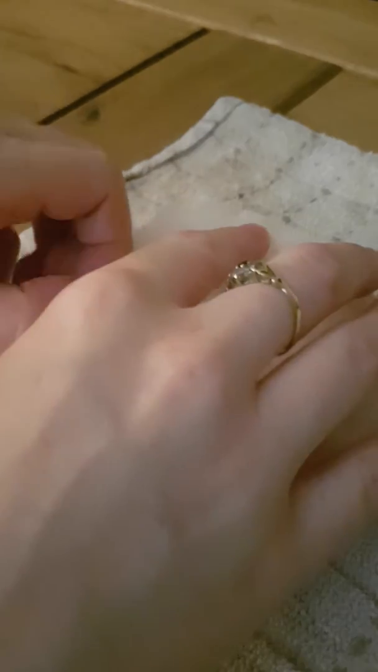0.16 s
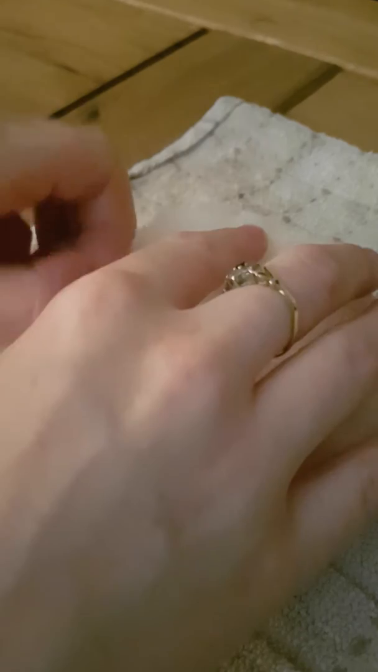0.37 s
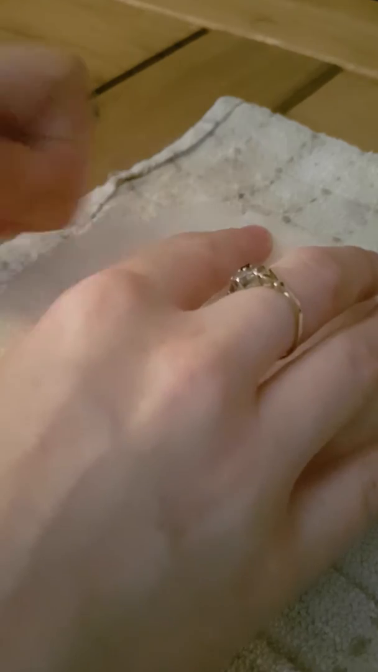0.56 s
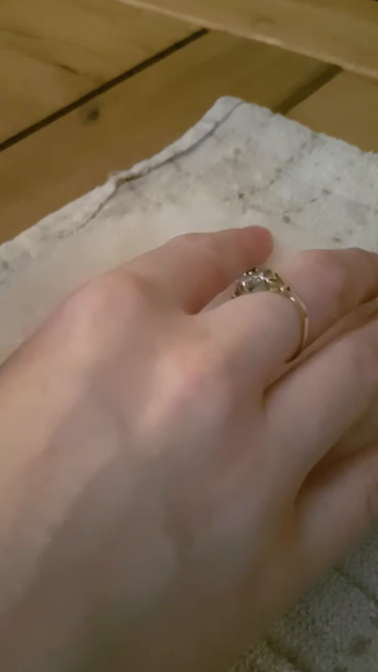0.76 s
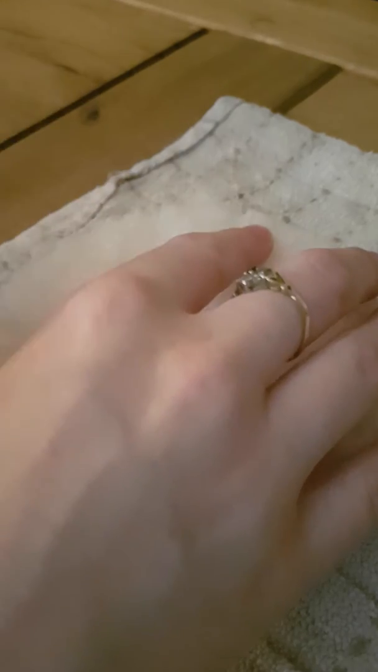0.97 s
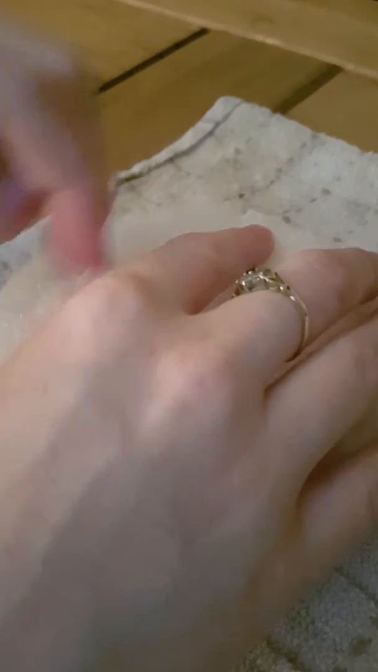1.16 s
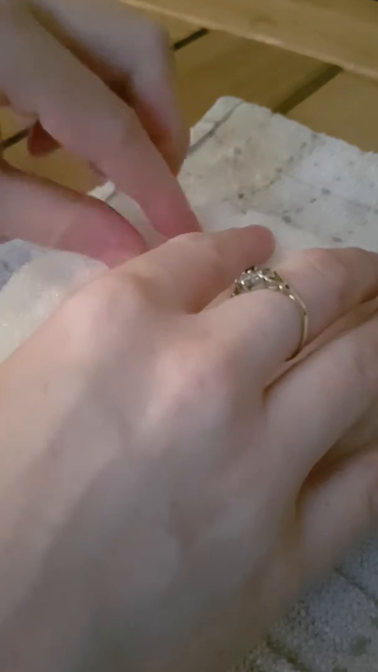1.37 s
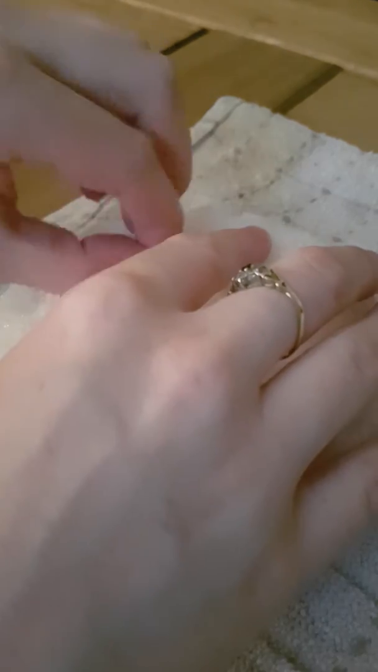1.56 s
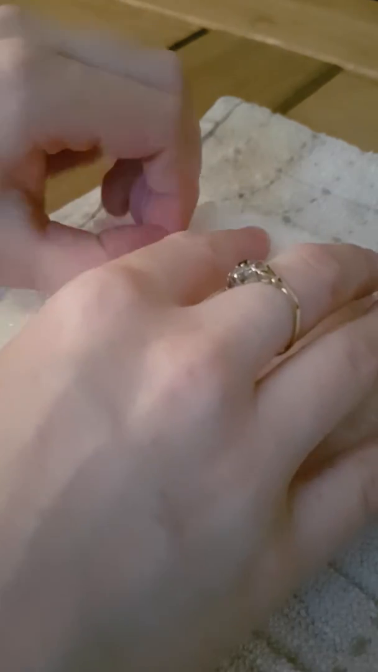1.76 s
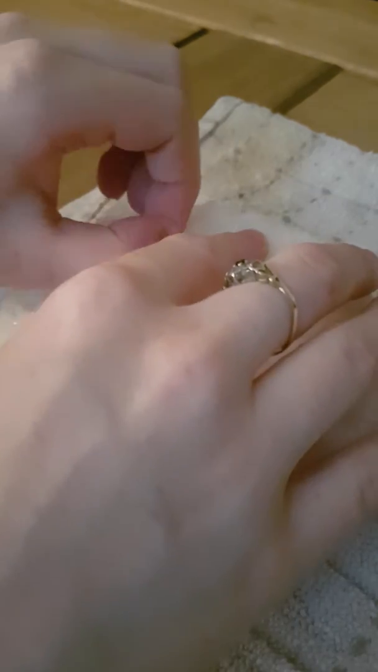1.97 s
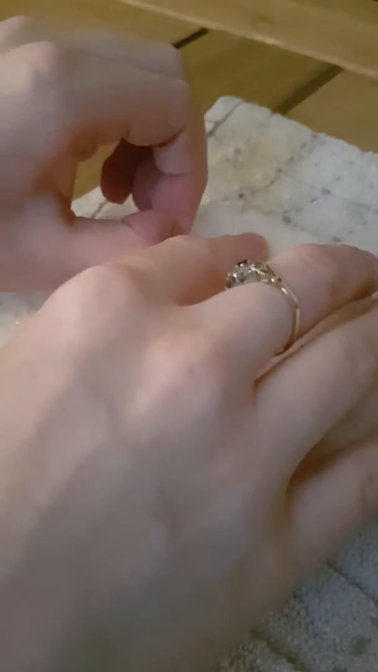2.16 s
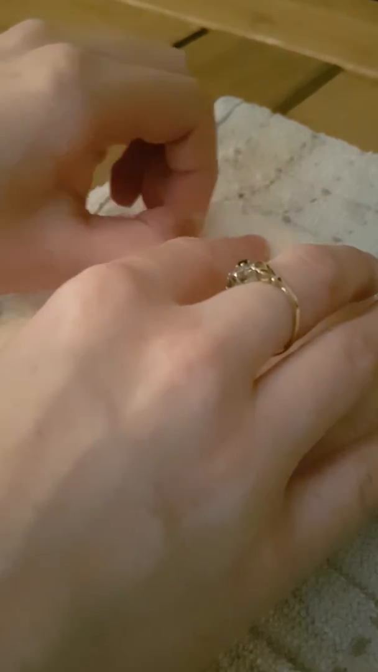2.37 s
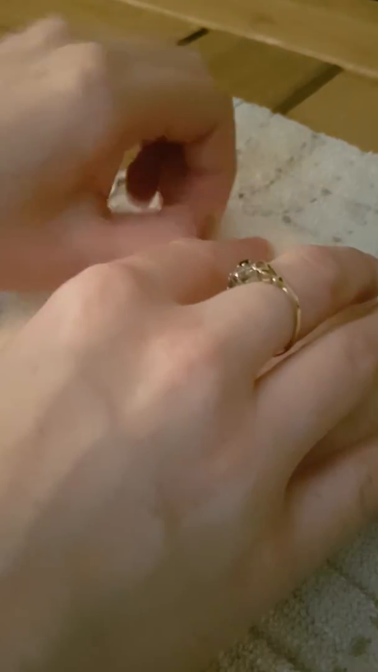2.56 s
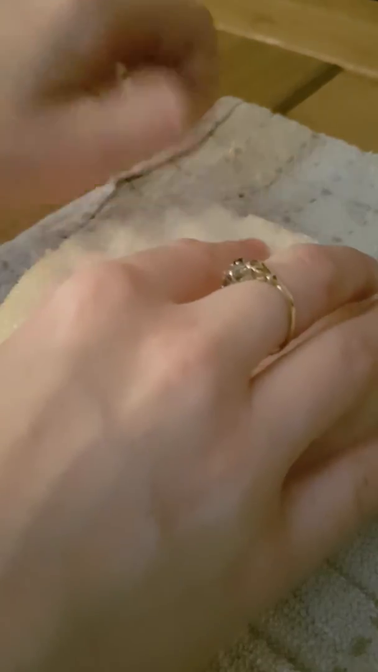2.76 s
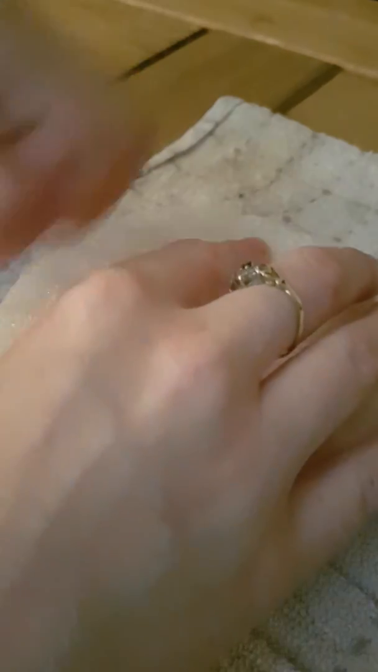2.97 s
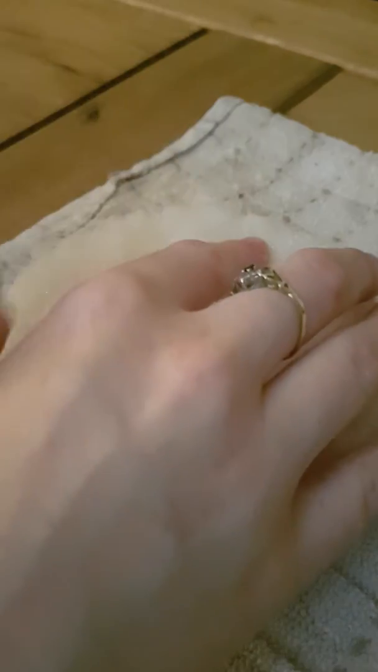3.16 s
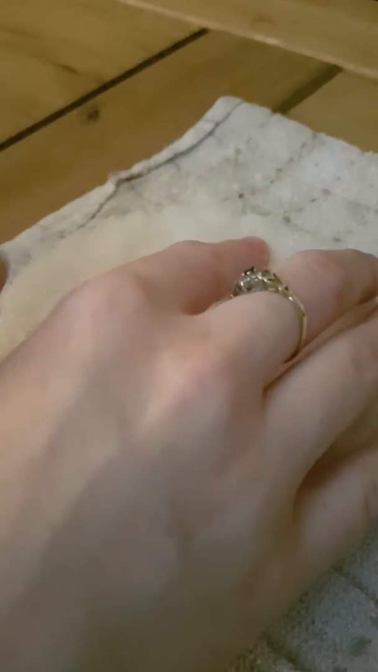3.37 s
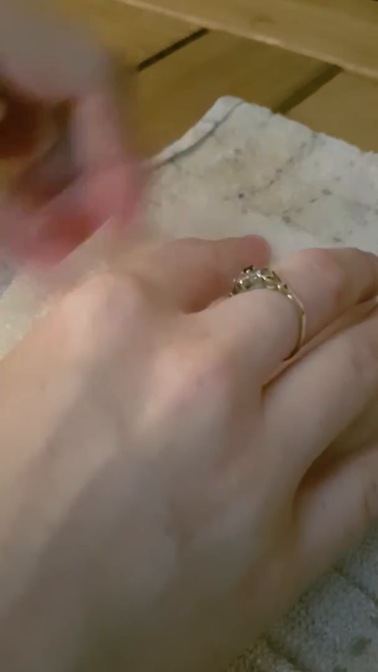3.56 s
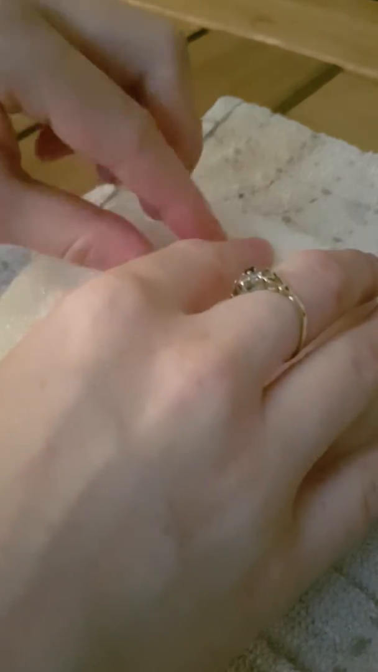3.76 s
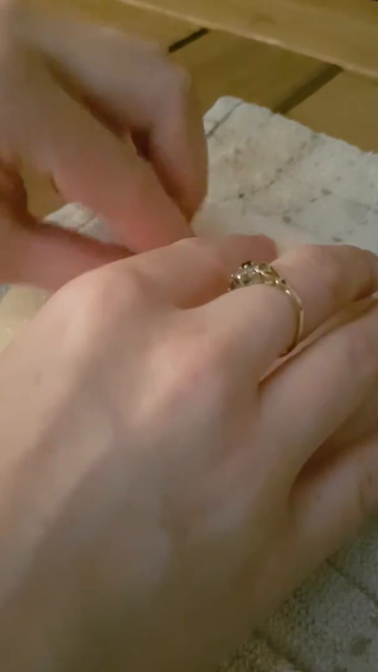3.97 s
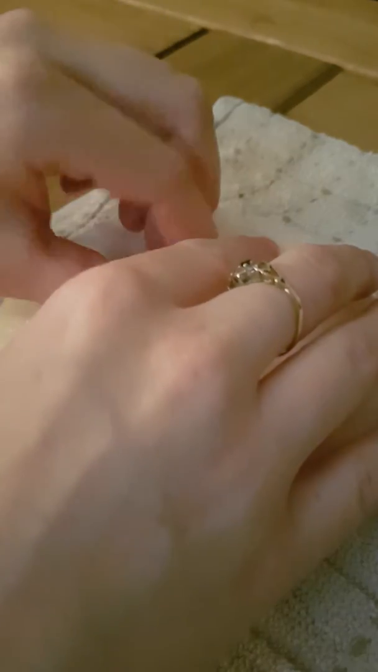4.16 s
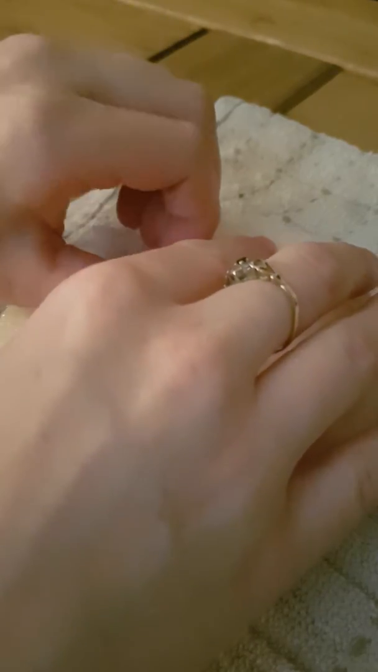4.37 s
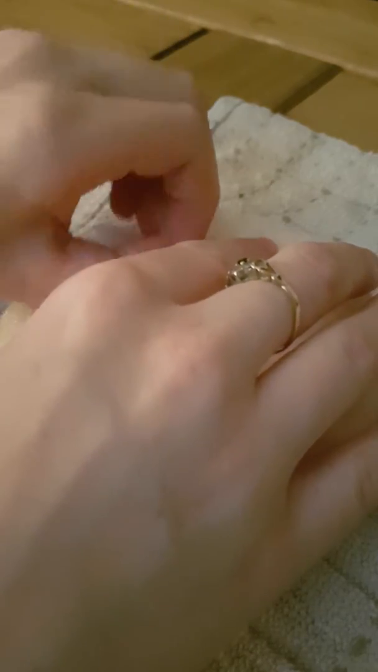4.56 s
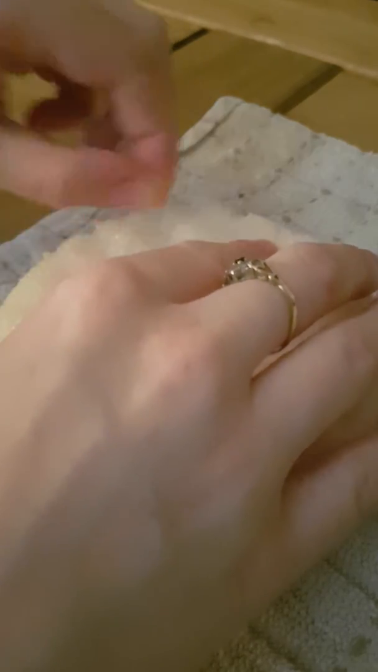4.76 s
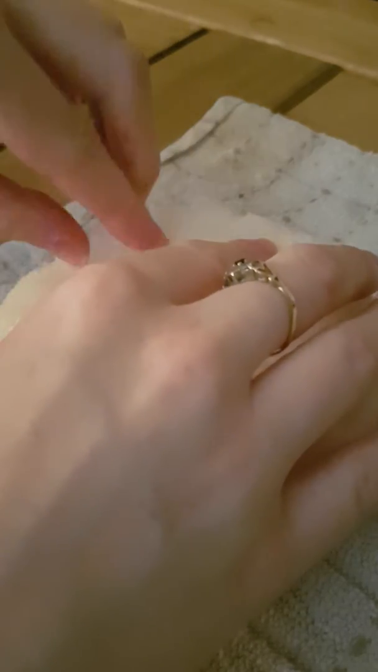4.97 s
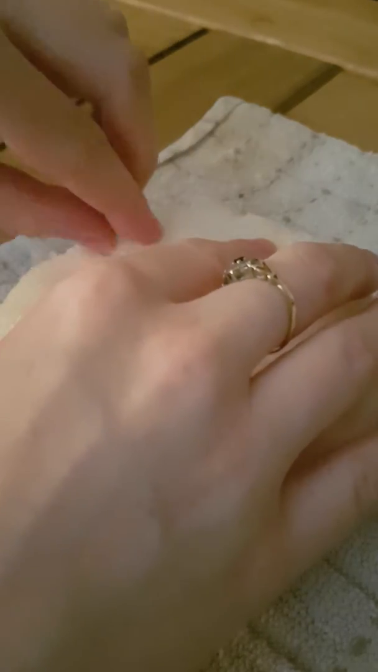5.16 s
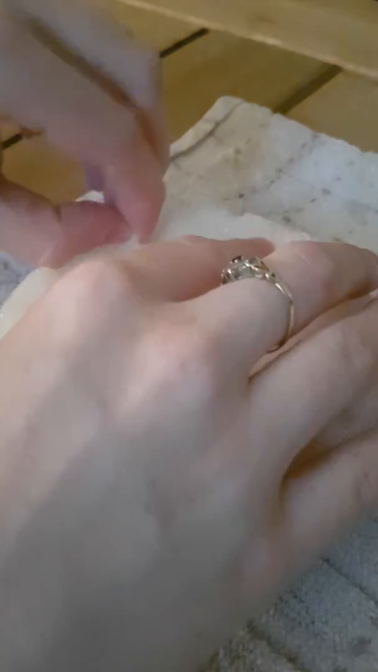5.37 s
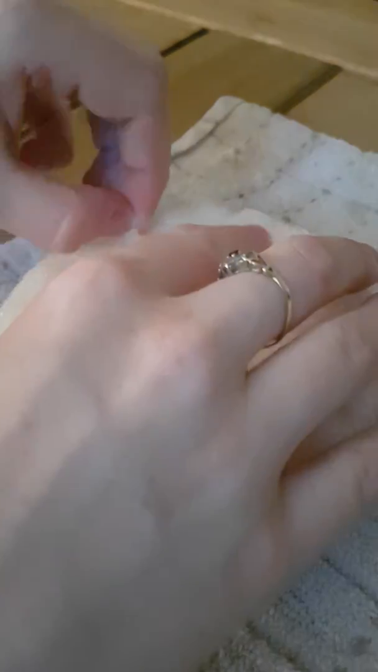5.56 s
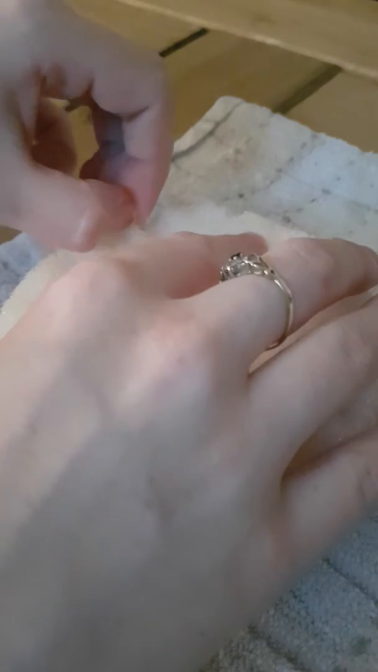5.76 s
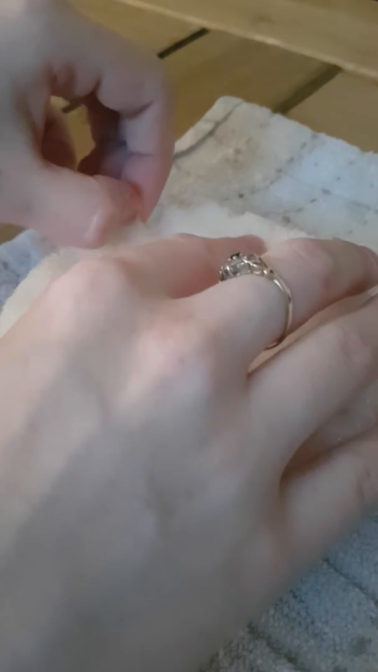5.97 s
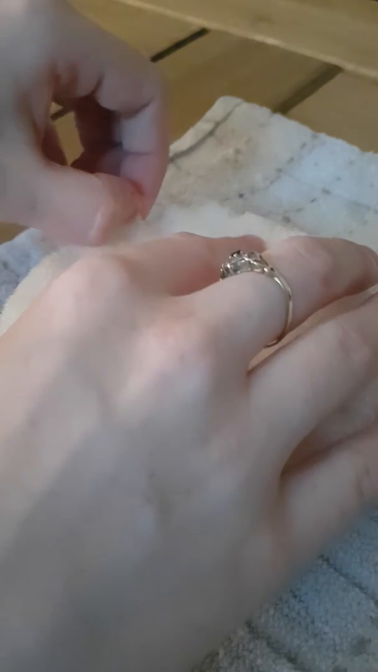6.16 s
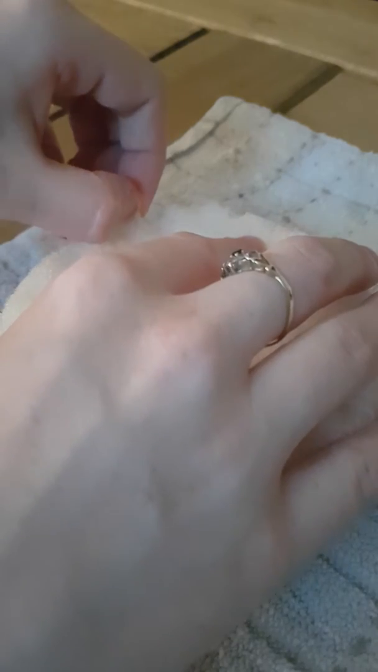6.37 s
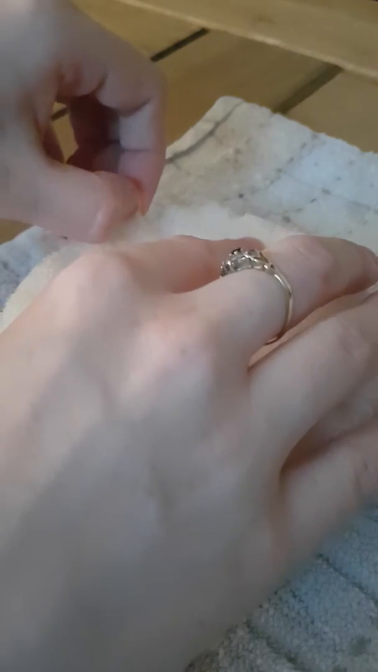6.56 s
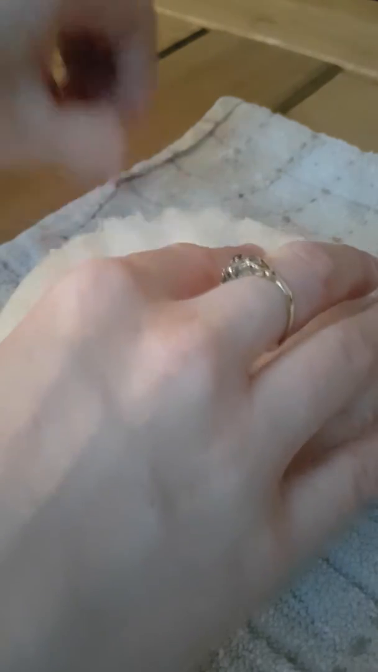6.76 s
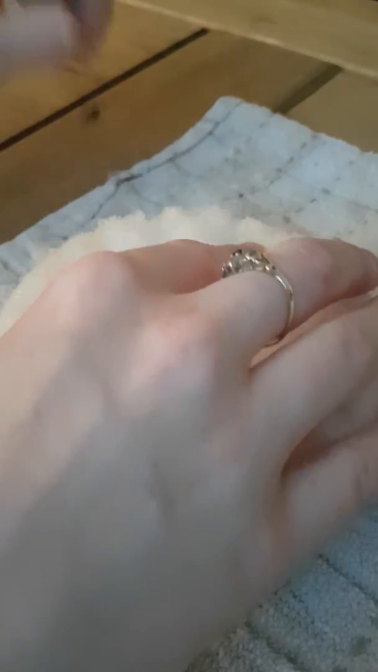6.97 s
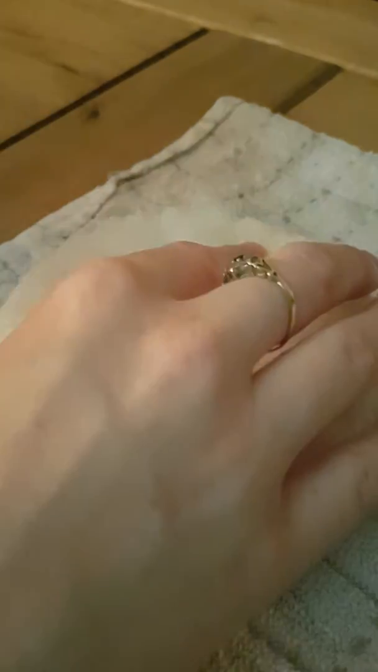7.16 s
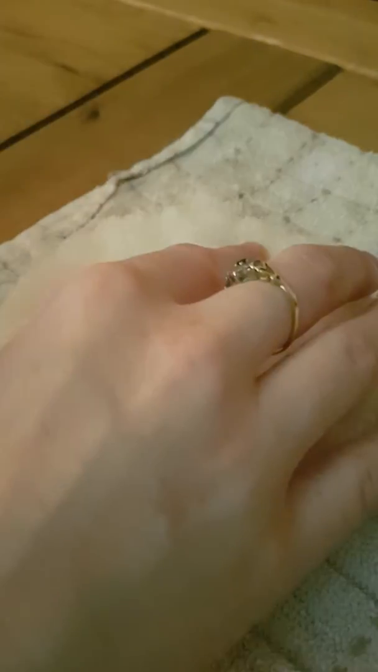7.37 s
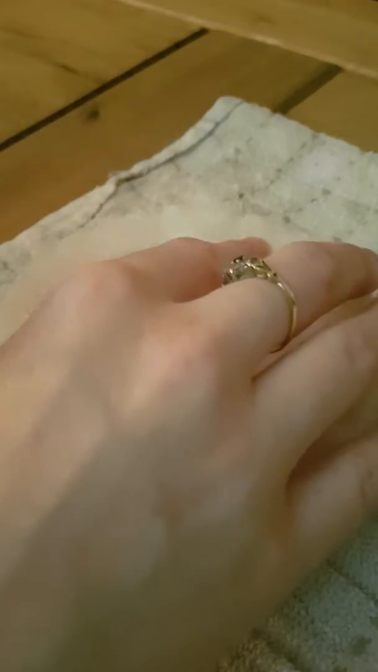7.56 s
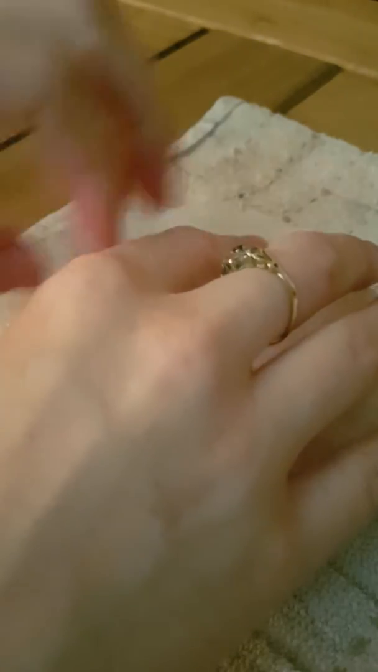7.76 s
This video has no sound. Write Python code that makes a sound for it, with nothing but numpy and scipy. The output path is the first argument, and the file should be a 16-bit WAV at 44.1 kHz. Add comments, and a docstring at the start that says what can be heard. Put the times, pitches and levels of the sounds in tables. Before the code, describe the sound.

Close, dry foam picking: soft rumbling touches and skin scrapes, sharp little clicks gathering into rushes, each tuft springing free with a low pop.

```python
"""Tufts pulled from a foam sponge

A quiet room with a faint hum; fingers pinch a foam sponge right by the microphone and pull out four tufts.
Skin and nails rub over the open cells: random catches and shoves, coloured and swelling with the touch.
Stretched strands snap one by one, then in a rush, as filtered clicks that jolt the block into ringing.
When a tuft comes free the foam springs back with a dull pop: a short swing of sinking pitch."""
import sys
import numpy as np
from scipy import signal
from scipy.fft import rfft, irfft, next_fast_len
from scipy.io import wavfile

SR = 44100
rng = np.random.default_rng(int(sys.argv[2]) if len(sys.argv) > 2 else 0)


def to_wav(s):
    """Save 16-bit WAV."""
    ch = np.atleast_2d(s).T  # columns
    pcm = np.round(np.clip(ch, -1, 1) * 32767)  # PCM
    wavfile.write(sys.argv[1], SR, pcm.astype(np.int16))


N = 344421


def from_db(db):
    """Decibels to gain."""
    return 10 ** (np.asarray(db) / 20)


def rms_one(x):
    """Scale to an rms of one."""
    return x / np.sqrt(np.mean(x ** 2) + 1e-20)


def in_time(rows):
    """Each column of a curve table, sample by sample."""
    s, *columns = np.transpose(rows)
    return [np.interp(np.arange(N) / SR, s, column) for column in columns]


def coloured(x, spectrum):
    """Give a flat source a spectrum, falling away below its first point; rms 1."""
    hz, db = np.transpose(spectrum)
    size = next_fast_len(N)
    bins = np.maximum(np.fft.rfftfreq(size, 1 / SR), 1)
    slope_db = np.interp(np.log(bins), np.log(hz), db)
    gain = from_db(slope_db) * np.minimum(bins / hz[0], 1)
    return rms_one(irfft(rfft(x, size) * gain, size)[:N])


def drift(rate):
    """Slow chance with an rms of one, heading for a new value so many times a second."""
    steps = np.arange(N) / SR * rate
    return rms_one(np.interp(steps, np.arange(N // 10), rng.standard_normal(N // 10)))


def cut(x, hz, kind, order=2):
    """Butterworth low- or high-pass."""
    edge_hz = np.clip(hz, 10, SR / 2 - 2000)
    return signal.sosfilt(signal.butter(order, edge_hz, kind, fs=SR, output="sos"), x)


def bell(x, hz, width_hz, db):
    """Raise or lower one band."""
    b, a = signal.iirpeak(hz, hz / width_hz, fs=SR)
    return x + (from_db(db) - 1) * signal.lfilter(b, a, x)


def add(track, s, sound):
    """Mix a sound into a track at a time."""
    at = round(s * SR)
    track[at:at + len(sound)] += sound[:N - at]


def grains(per_s, spread_db, size):
    """Random clicks of uneven strength and either sign."""
    strength = from_db(spread_db * np.minimum(rng.exponential(1, size), 4))
    return (rng.random(size) < per_s / SR) * strength * rng.choice([-1, 1], size)


# colour of the background hiss: pitch_hz, relative_level_db
HISS_COLOUR = [(25, -8), (55, -4.5), (100, -1.5), (160, -6), (280, -7), (500, -8), (1000, -14), (2300, -19),
               (6000, -24), (16000, -28.5)]
# mains hum: pitch_hz, mean_level_db
HUM = [(99, -71), (198, -80), (297, -82.5)]
HISS_DB = -67


def room():
    """Even background hiss with a faint hum that wavers in pitch and level."""
    t = np.arange(N) / SR + .0003 * drift(2.6)
    hum = sum(from_db(db) * np.sqrt(2) * np.cos(2 * np.pi * hz * t) for hz, db in HUM)
    hiss = from_db(HISS_DB) * coloured(rng.standard_normal(N), HISS_COLOUR)
    return hiss + from_db(1.3 * drift(1.1)) * hum


STROKE_ATTACK_S, STROKE_SAG_DB_PER_S, STROKE_RELEASE_S = 0.0053, 15, .009


def contact(t, start_s, length_s):
    """Gain of one touch: a quick attack, a hold, a release."""
    before = (start_s - t) / STROKE_ATTACK_S
    after = (t - start_s - length_s) / STROKE_RELEASE_S
    return np.exp(-np.clip(np.maximum(before, after), 0, 20))


# finger and thumb close on the foam and hold it: start_s, end_s, relative_rumble_db, relative_scratch_db
PINCHES = [(-.2, .43, -50, -64), (1.335, 2.27, -48, -59), (3.854, 4.64, -46, -61.5), (4.938, 5.8, -49, -62)]
# fingers shift on the foam: start_s, length_s, relative_rumble_db, relative_scratch_db
STROKES = [(0.056, .07, -42, -55.5), (0.281, 0.041, -45, -56), (0.496, .035, -40, -62),
           (0.58, 0.024, -49, -58.5), (.63, 0.34, -70, -82), (1.346, 0.061, -38, -55.5),
           (1.574, 0.042, -39.5, -61), (1.649, 0.02, -39, -77), (1.913, 0.017, -48, -58.5),
           (2.134, 0.15, -50, -61), (2.325, 0.038, -49, -61), (2.426, 0.23, -49, -60.5),
           (2.708, 0.066, -43.5, -69), (2.926, 0.021, -47, -79), (3.204, 0.029, -53, -82),
           (3.753, 0.026, -56, -70.5), (3.859, 0.042, -41.5, -63.5), (4.002, 0.032, -36, -56),
           (4.111, 0.045, -40, -57), (4.226, 0.014, -47.5, -58.5), (4.591, 0.071, -36.5, -56),
           (4.785, .025, -52, -77), (4.96, 0.032, -36, -56), (5.099, 0.047, -40.5, -58),
           (5.311, 0.042, -47, -63), (5.912, 0.05, -52.5, -60), (6.685, 0.055, -43, -58),
           (6.903, .045, -52, -70), (7.55, .3, -64, -73.5)]
SQUEEZE_S, HOLD_DB = 0.24, -8.5   # the squeeze is hardest this long after landing, then eases to a hold
FIRM_SLIDE_DB = -39   # a slide this loud grips the foam fully
REST_RUMBLE_DB, REST_SCRATCH_DB = -69.5, -77.5   # the other hand lies on the sponge
# after a pop: delay, fade over the slide, rumble above scratch
SLIDE_LAG_S, SLIDE_FADE_DB, SLIDE_RUMBLE_DB = 0.013, 23.5, 12.5


def fingers():
    """Rumble dB, scratch dB and grip (0-1): touches add as power while fingers pinch, shift and slide off."""
    t = np.arange(0, N / SR, .001)
    touches, grip = [(np.ones(len(t)), REST_RUMBLE_DB, REST_SCRATCH_DB)], np.zeros(len(t))
    for start, end, rumble_db, scratch_db in PINCHES:
        age = np.maximum(t - start, 0) / SQUEEZE_S
        squeeze = (age * np.exp(1 - age)) ** 3.24
        pressure = from_db(HOLD_DB * (1 - squeeze))
        touches.append((contact(t, start, end - start) * pressure, rumble_db, scratch_db))
        grip += squeeze * (start > 0)   # a pinch already under way at the start adds no grip
    for start, length, rumble_db, scratch_db in STROKES:
        sag = from_db(-STROKE_SAG_DB_PER_S * np.maximum(t - start, 0))
        touches.append((contact(t, start, length) * sag, rumble_db, scratch_db))
    for free_s, *_, slide_db, length in TUFTS:
        start = free_s + SLIDE_LAG_S
        sliding = contact(t, start, length)
        fade = from_db(-SLIDE_FADE_DB * np.maximum(t - start, 0) / length)
        touches.append((sliding * fade, slide_db + SLIDE_RUMBLE_DB, slide_db))
        grip += sliding * from_db(slide_db - FIRM_SLIDE_DB)
    rumble = sum((gain * from_db(db)) ** 2 for gain, db, _ in touches)
    scratch = sum((gain * from_db(db)) ** 2 for gain, _, db in touches)
    return in_time(np.transpose([t, 10 * np.log10(rumble), 10 * np.log10(scratch), np.minimum(grip, 1)]))


LOOSE_HZ, TIGHT_HZ = 292, 544   # upper edge of the rumble: foam is stiffer the harder it is pinched


def gripped(x, grip):
    """A steep low-pass whose edge follows the grip, blended from a few fixed ones."""
    edges = np.geomspace(220, 660, 5)
    place = np.interp(LOOSE_HZ + (TIGHT_HZ - LOOSE_HZ) * grip, edges, np.arange(len(edges)))
    blended = np.zeros(N)
    for k, hz in enumerate(edges):
        share = np.maximum(1 - abs(place - k), 0)
        blended += share * rms_one(cut(x, hz, "low", order=6))
    return blended


# colour of the shoves, before the grip filters them: pitch_hz, relative_level_db
RUMBLE_COLOUR = [(30, -19.5), (55, -16.5), (85, 0.5), (125, 3.5), (190, -4), (290, -4.5), (450, -7),
                 (700, -15), (2000, -14)]
# colour of skin and nails on open cells, also of tearing fibres: pitch_hz, relative_level_db
SCRATCH_COLOUR = [(200, -7), (600, 4.5), (1300, -0.5), (2300, 1.5), (3300, -1), (4600, -0.5), (6000, -8),
                  (8000, -18), (11000, -20), (16000, -28.5)]
# colour of buckling cell walls: pitch_hz, relative_level_db
CRUNCH_COLOUR = [(200, -12), (400, 4.5), (600, -2), (950, -4), (1500, -11.5), (3000, -18), (8000, -46.5)]
SCRAPE_SHARE = .45   # share of the rumble's unevenness that the scratch follows


def rubbing(rumble_db, scratch_db, crunch_db, tick_db, tick_limit_db, slip_db, lumpy_db,
            catches_per_s, shoves_per_s, ticks_per_s):
    """Skin sticks and slips: cell walls flick past it, some buckle, and small shoves shake the block."""
    kneading, scratching, grip = fingers()
    # each small slip of the skin both shoves and scrapes
    lumps = lumpy_db * drift(38)
    kneading, scratching = kneading + lumps, scratching + SCRAPE_SHARE * lumps
    slip = from_db(slip_db * drift(110))

    # in a loud scrape the single catches merge into an even hiss
    sliding = np.clip((scratching + 58) / 6, 0, .6)
    single = rms_one(grains(catches_per_s, 5.3, N) * slip)
    merged = rng.standard_normal(N)
    catches = coloured(np.sqrt(1 - sliding) * single + np.sqrt(sliding) * merged, SCRATCH_COLOUR)
    scratch = from_db(scratching + scratch_db) * catches

    shoves = gripped(coloured(grains(shoves_per_s, 0.61, N), RUMBLE_COLOUR), grip)
    rumble = from_db(kneading + rumble_db) * shoves

    buckles = coloured(grains(170, 1.8, N) * slip, CRUNCH_COLOUR)
    crunch = from_db((kneading + scratching) / 2 + crunch_db) * buckles

    # a nail flicks single cell walls, which are too small to get loud
    flicks = coloured(grains(ticks_per_s, 1.5, N), SCRATCH_COLOUR)
    ticks = flicks * from_db(np.minimum(scratching, tick_limit_db) + tick_db)
    return scratch + ticks + crunch + rumble


# a fingertip bumps the block: start_s, height_db, taut_pitch_hz
KNOCKS = [(1.3525, -31.5, 105), (2.438, -35.5, 150), (3.856, -27.5, 116), (4.553, -36.5, 151.5),
          (5.2043, -29, 199), (5.241, -33.5, 200), (5.3102, -27, 177)]
# a tuft comes free: free_s, rush_lead_s, relative_snap_db, snap_brightness_hz, relative_crackle_db,
#   pop_height_db, taut_pop_hz, pop_swell_s, thud_height_db, taut_thud_hz, relative_slide_db, slide_length_s
TUFTS = [(0.4328, 0.0061, -13, 1850, -32.5, -16.5, 295, 0.0022, -42, 116, -49.5, 0.19),
         (2.6397, .025, -11.5, 2500, -20, -7.5, 210, .0023, -19.5, 105, -41.5, .11),
         (4.648, .008, -9.5, 2090, -27.5, -11, 314, 0.0026, -18.5, 116, -41.5, 0.093),
         (6.7768, .0125, -5.5, 2630, -20, -8, 148, .0068, -12.5, 93, -51, 0.097)]
THUD_SWELL_S, THUD_LAG_SWELLS = 0.0045, 3.2   # the whole block follows the pop


def recoils(relax_s, pop_slack, ring_slack, ring_db, ring_cycles, knock_cycles):
    """Released or bumped foam swings a few times and is soon still, its pitch sinking as the tension goes."""
    swings = [(s, db, hz, ring_slack, knock_cycles / hz) for s, db, hz in KNOCKS]
    for s, _, _, _, _, pop_db, pop_hz, swell_s, thud_db, thud_hz, *_ in TUFTS:
        swings.append((s, pop_db, pop_hz, pop_slack, swell_s))
        # the higher modes of the block join in, less so after a slow pop
        for hz, mode_db, _ in FOAM_MODES:
            if hz > 1.6 * pop_hz:
                slow_loss_db = 20 * np.log10(1 + (hz * swell_s / 2.5) ** 2)
                height_db = pop_db + ring_db + mode_db - slow_loss_db
                swings.append((s, height_db, hz, ring_slack, ring_cycles / hz))
        swings.append((s + THUD_LAG_SWELLS * swell_s, thud_db, thud_hz, ring_slack, THUD_SWELL_S))
    out, t = np.zeros(N), np.arange(SR // 16) / SR
    for s, db, taut_hz, slack, swell in swings:
        hz = taut_hz * (slack + (1 - slack) * np.exp(-t / relax_s))
        # rises to one at the swell time, then dies away
        envelope = np.sqrt(t / swell * np.exp((1 - (t / swell) ** 2) / 2))
        add(out, s, from_db(db) * envelope * np.sin(2 * np.pi * np.cumsum(hz) / SR))
    return out


def rips(fibres_per_s, rise_s, stop_s, top_hz):
    """Breaking fibres crackle ever louder until the tuft is free, at the height of the pop."""
    t, level = np.arange(N) / SR, np.zeros(N)
    for s, _, _, _, crackle_db, _, _, swell_s, *_ in TUFTS:
        since = t - s - swell_s
        decay = np.maximum(-since / rise_s, since / stop_s)
        level += from_db(crackle_db) * np.exp(-np.minimum(decay, 20))
    fibres = coloured(grains(fibres_per_s, 2.9, N), SCRATCH_COLOUR)
    return cut(level * fibres, top_hz, "low")


# ring of the block of foam under the hand: nominal_pitch_hz, relative_level_db, t60_s (for jolts by snaps)
FOAM_MODES = [(135, -55, 0.032), (218.7, -23.5, 0.027), (404, -23.5, 0.02), (609, -26, 0.0052),
              (900, -35.5, 0.0017)]


def foam_ring(breaks, level_db, uneven_db, detune, dull_boost, travel_s):
    """Every snap jolts the block; its pitch shifts with the grip, and thick strands jolt it hardest."""
    hz, mode_db, t60 = np.transpose(FOAM_MODES)[:, :, None]
    out, t = np.zeros(N), np.arange(SR // 14) / SR
    for s, db, bright_hz in breaks:
        # both vary by chance from snap to snap
        grip, strike = rng.standard_normal((2, len(FOAM_MODES), 1))
        sizes = from_db(db + level_db + mode_db + uneven_db * strike - 60 * t / t60)
        swings = sizes * np.sin(2 * np.pi * hz * np.exp(detune * grip) * t)
        # waves are slow in foam, so the knock trails the click
        add(out, s + travel_s, swings.sum(axis=0) * (3000 / bright_hz) ** dull_boost)
    return cut(out, 1200, "low")


# stretched strands that snap on their own: start_s, relative_strength_db, brightness_hz
LONE_SNAPS = [(0.0484, -33, 2800), (.0737, -29, 2700), (0.093, -30.5, 2500), (0.1095, -22.5, 2360),
              (0.2797, -23.5, 3320), (0.284, -14.5, 3130), (.297, -21.5, 3100), (.3054, -22.5, 2600),
              (.3722, -31.5, 2500), (0.3943, -25.5, 2420), (1.382, -37.5, 3500), (1.553, -27, 2020),
              (1.5822, -34, 2090), (1.6086, -39, 1900), (1.65, -37, 3700), (1.9201, -24, 4300),
              (1.9464, -27, 3360), (2.124, -26.5, 2930), (2.145, -16, 3100), (2.1526, -15, 2150),
              (2.1693, -19.5, 3100), (2.1798, -13.5, 2730), (2.1975, -17.5, 4870), (2.2022, -21, 3400),
              (2.2105, -13, 2840), (2.216, -16.5, 3450), (2.223, -22, 3700), (2.245, -23, 3600),
              (2.253, -13, 3350), (2.3239, -12.5, 4130), (2.332, -18, 3140), (2.3348, -17, 3200),
              (2.3753, -17.5, 3160), (2.3785, -17.5, 2980), (2.4379, -34, 2950), (2.4864, -23.5, 3250),
              (2.5282, -23.5, 2940), (2.5525, -17, 2480), (2.5916, -18, 2400), (4.0052, -35, 3100),
              (4.0119, -29.5, 2600), (4.0366, -23.5, 1880), (4.1544, -17, 1690), (4.438, -40.5, 4400),
              (4.5527, -30, 2630), (4.5982, -16, 1840), (4.609, -24.5, 3100), (4.9766, -28.5, 2800),
              (5.0142, -34.5, 2430), (5.203, -29, 2200), (5.3045, -34, 3050), (5.318, -30, 2740),
              (5.5861, -30, 4840), (5.5954, -28, 4750), (5.6552, -33, 3730), (5.6993, -26, 4600),
              (5.7131, -20.5, 4500), (5.7334, -20.5, 4580), (5.7523, -21.5, 4400), (5.78, -24.5, 4060),
              (5.9076, -17, 4050), (5.915, -13.5, 3600), (5.928, -20, 4240), (5.932, -20.5, 4600),
              (5.9374, -18.5, 4100), (5.9513, -22.5, 3500), (5.9544, -15, 3500), (6.027, -23, 3230),
              (6.1487, -26.5, 4300), (6.1583, -21.5, 3500), (6.169, -22.5, 3500), (6.29, -18.5, 3460),
              (6.292, -22.5, 3530), (6.3557, -19, 3560), (6.3845, -25.5, 3900), (6.4782, -21, 3600),
              (6.486, -25, 3700), (6.5297, -28, 4100), (6.6392, -21.5, 4130), (6.672, -27, 3100),
              (6.6831, -21.5, 4100), (6.6901, -13.5, 3300), (6.702, -14.5, 3220), (6.72, -20, 3500),
              (6.7338, -14, 4000), (6.7397, -17, 4200), (6.7584, -10.5, 3830)]
# a strand may take its neighbour with it: chance, mean delay, relative strength
NEIGHBOUR_SHARE, NEIGHBOUR_S, NEIGHBOUR_DB = .15, 0.0046, -15
RUSH_GAP_S, RUSH_RISE_DB_PER_S = .0045, 154   # snaps in the rush: their mean spacing and growth


def strands(uneven_db):
    """Every strand that breaks, as (s, dB, Hz): lone ones, their neighbours, and the rush that frees each tuft."""
    rows = list(LONE_SNAPS)
    for (s, db, hz), (luck, lag) in zip(LONE_SNAPS, rng.random((len(LONE_SNAPS), 2))):
        if luck < NEIGHBOUR_SHARE:
            rows.append((s + NEIGHBOUR_S * (.5 + lag), db + NEIGHBOUR_DB, hz))
    for free_s, rush_s, db, hz, _, _, _, swell_s, *_ in TUFTS:
        for k, (early, size, thin) in enumerate(rng.uniform(-1, 1, size=(12, 3))):
            since_free = RUSH_GAP_S * (k + .25 * early) - rush_s
            if since_free < 1.7 * swell_s:
                strength_db = db + RUSH_RISE_DB_PER_S * min(since_free, 0) + uneven_db * size
                rows.append((free_s + since_free, strength_db, hz * np.exp(0.3 * thin)))
    return rows


# how sharply the strands of each tuft crack, one row a tuft: extra_edge_db
TUFT_EDGE_DB = [-0.5, 3, 1.5, 0]


def snaps(breaks, level_db, splinter_db, splinter_s, top_ratio, bottom_ratio,
          edge_db, edge_db_per_octave, edge_hz):
    """A strand breaks with one sharp drop in pressure; a few cell walls beside it follow at once."""
    out, t = np.zeros(N), np.arange(SR // 50) / SR
    for s, db, hz in breaks:
        crack = from_db(splinter_db) * grains(5000, 8.34, len(t)) * np.exp(-t / splinter_s)
        crack[0] = -1
        crack = crack / np.linalg.norm(crack)
        tuft = sum(s > free_s + .1 for free_s, *_ in TUFTS[:-1])
        # thin strands let go faster and so sound brighter and sharper
        soft = cut(cut(crack, hz * top_ratio, "low", order=4), hz * bottom_ratio, "high", order=1)
        sharp_db = edge_db + TUFT_EDGE_DB[tuft] + edge_db_per_octave * np.log2(hz / 3000)
        edge = from_db(sharp_db) * cut(crack, edge_hz, "high")
        add(out, s, from_db(db + level_db) * (soft + edge) * np.sqrt(3000 / hz))
    return out


def scene():
    """Snaps, pops and rubbing, close and dry, over the quiet room."""
    breaks = strands(uneven_db=6.0)
    cracks = snaps(breaks, level_db=14.5, splinter_db=-24, splinter_s=0.0008, top_ratio=1.242,
                   bottom_ratio=0.51, edge_db=-20.5, edge_db_per_octave=10, edge_hz=5700)
    # the microphone port favours the upper middle and rings a little in the treble
    cracks = bell(bell(cracks, 4280, 1300, db=2.0), 7000, 2000, db=-4.0)
    cracks = bell(bell(cracks, 1650, 700, db=-1), 2750, 700, db=-2.0)
    cracks = cut(bell(cracks, 9500, 2200, db=3.0), 9370, "low")
    body = foam_ring(breaks, level_db=2.5, uneven_db=2.0, detune=0.2, dull_boost=0.79, travel_s=.0013)
    pops = recoils(relax_s=0.013, pop_slack=.53, ring_slack=0.81, ring_db=16.5, ring_cycles=1.7,
                   knock_cycles=0.42)
    pops = pops + rips(fibres_per_s=6400, rise_s=0.0046, stop_s=0.0019, top_hz=7450)
    rub = rubbing(rumble_db=-2.5, lumpy_db=2.5, scratch_db=-1.65, crunch_db=-11.5, tick_db=-6.0,
                  tick_limit_db=-60.0, slip_db=2.5, catches_per_s=3500, shoves_per_s=1500, ticks_per_s=61)
    # so small a block radiates little bass
    block = cut(body + pops, 69.0, "high", order=3)
    return (cracks + block + rub + room())[None]


CUTOFF_HZ = 16200


def record(dry):
    """The deepest bass and the very top are cut."""
    no_bass = cut(dry, 45, "high")
    return signal.sosfilt(signal.ellip(10, .1, 80, CUTOFF_HZ, fs=SR, output="sos"), no_bass)


dry = scene()
out = record(dry)
to_wav(out)
```